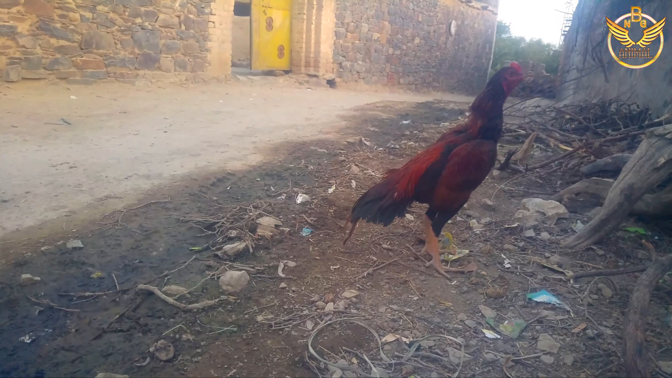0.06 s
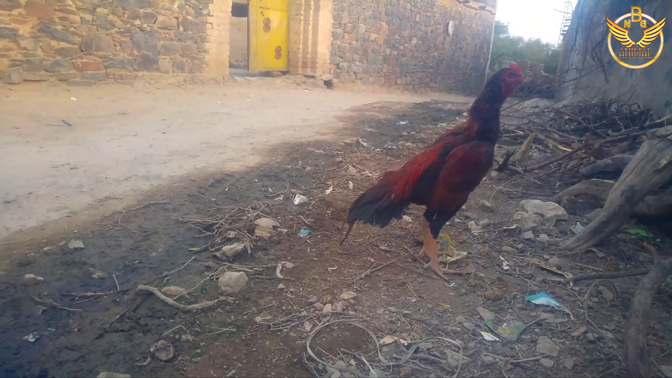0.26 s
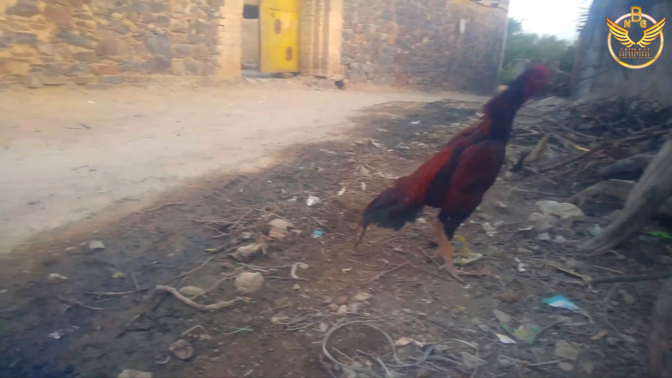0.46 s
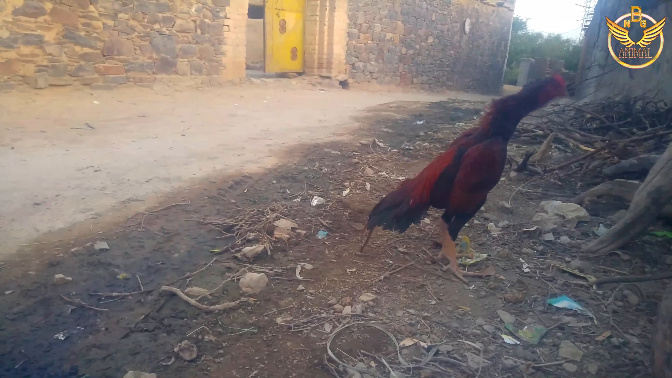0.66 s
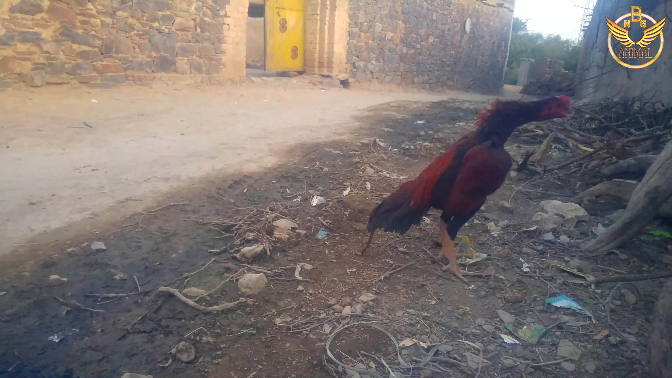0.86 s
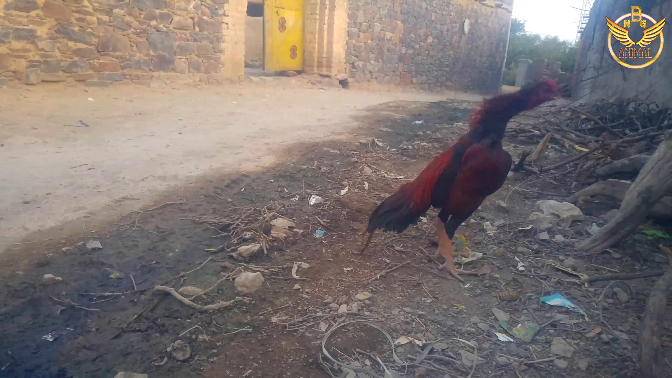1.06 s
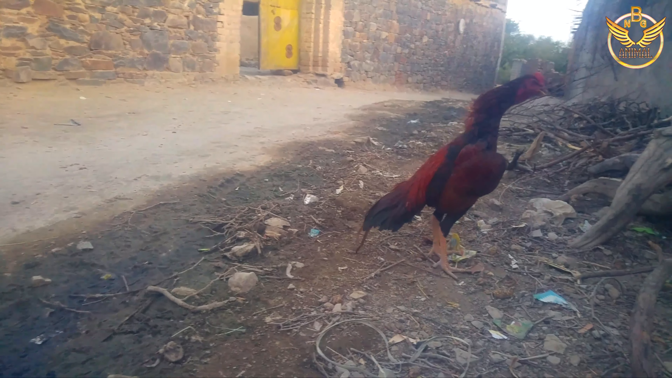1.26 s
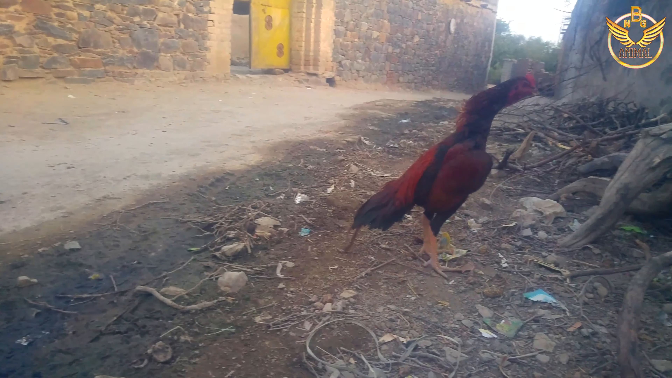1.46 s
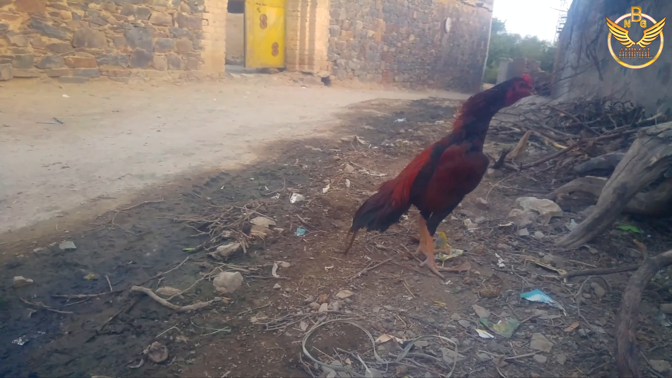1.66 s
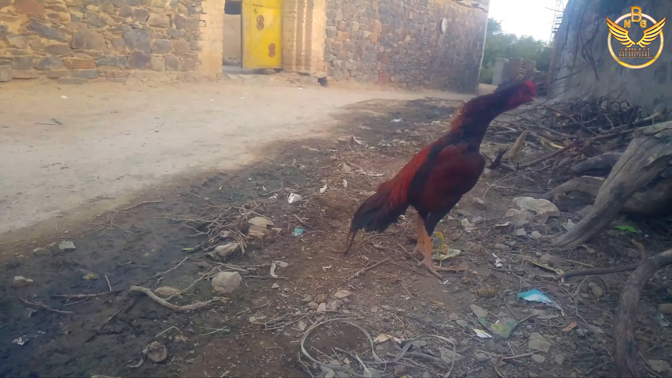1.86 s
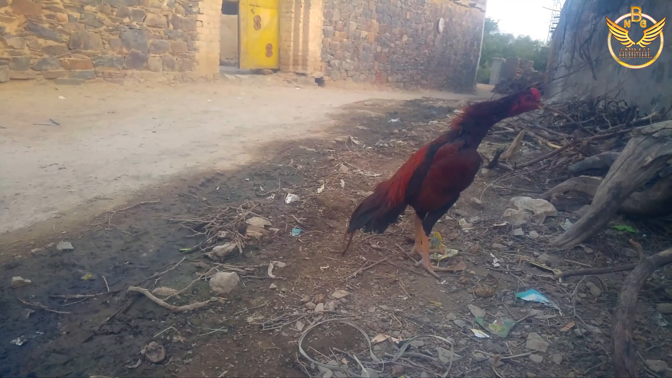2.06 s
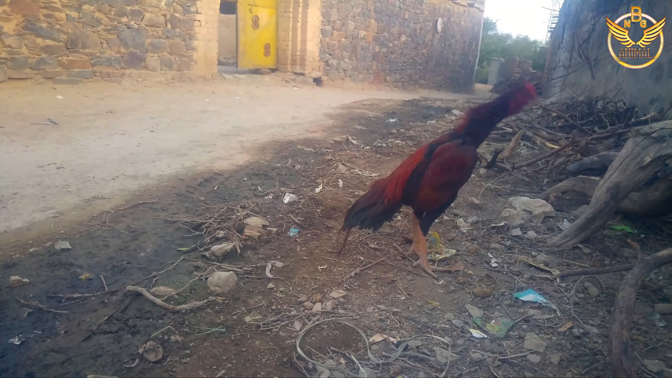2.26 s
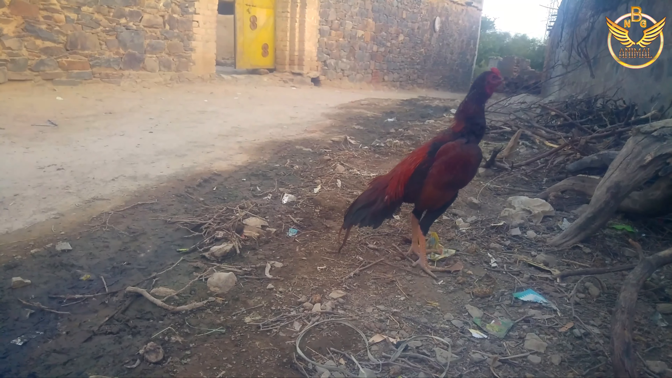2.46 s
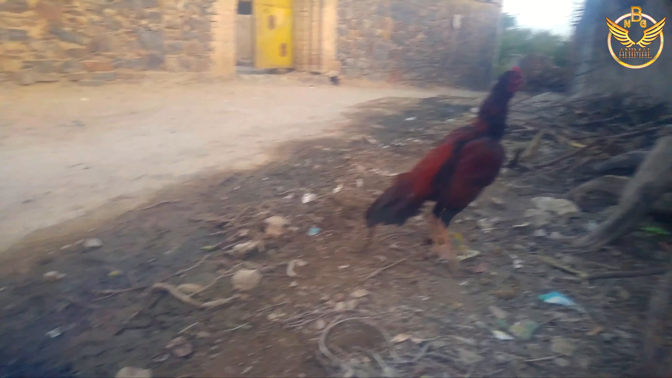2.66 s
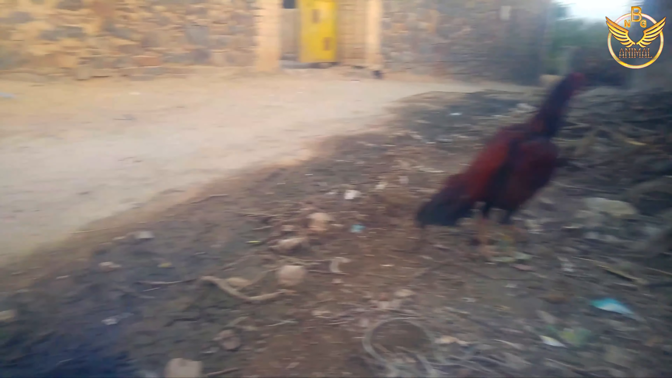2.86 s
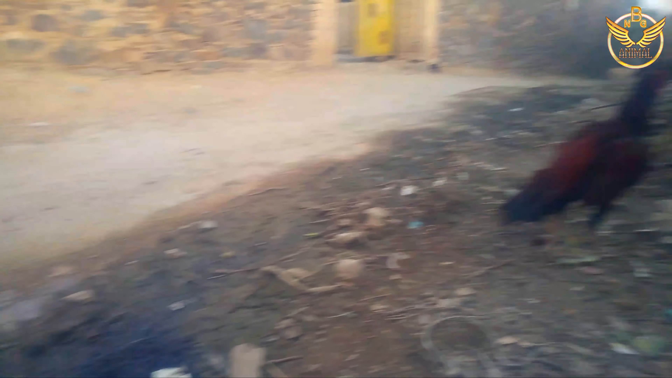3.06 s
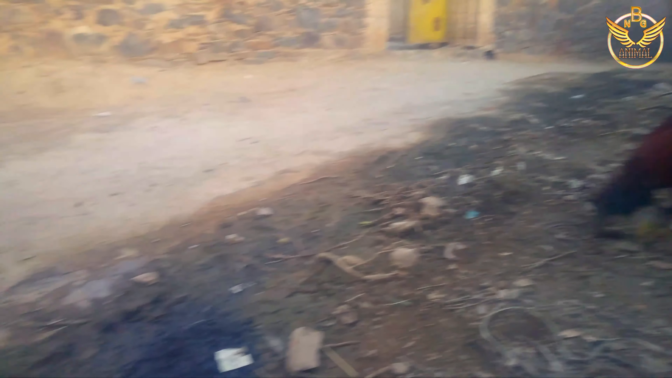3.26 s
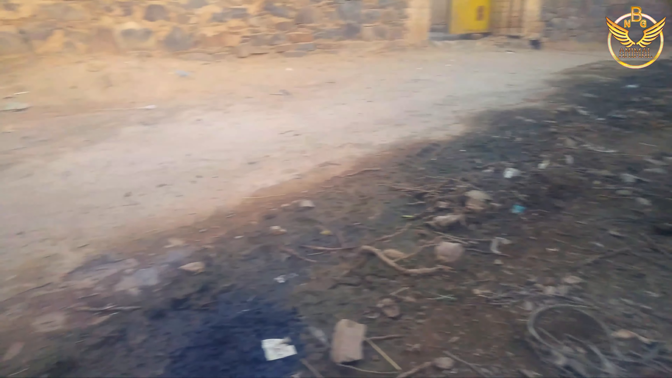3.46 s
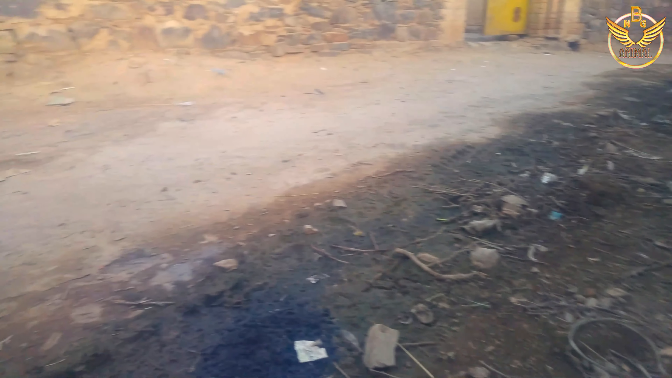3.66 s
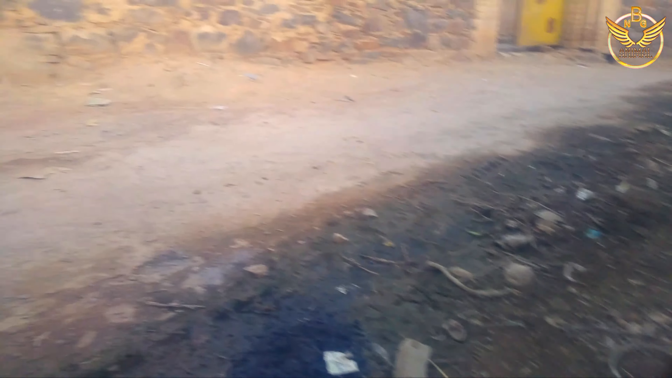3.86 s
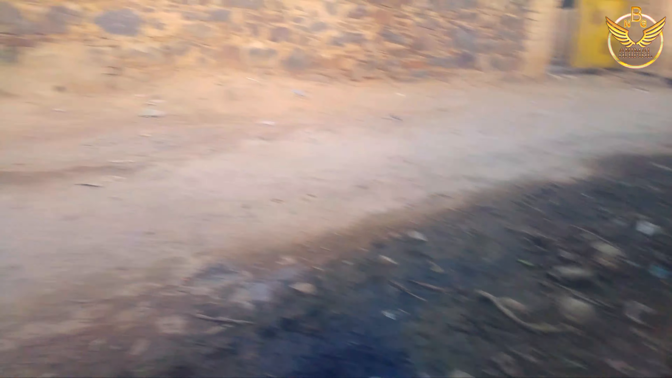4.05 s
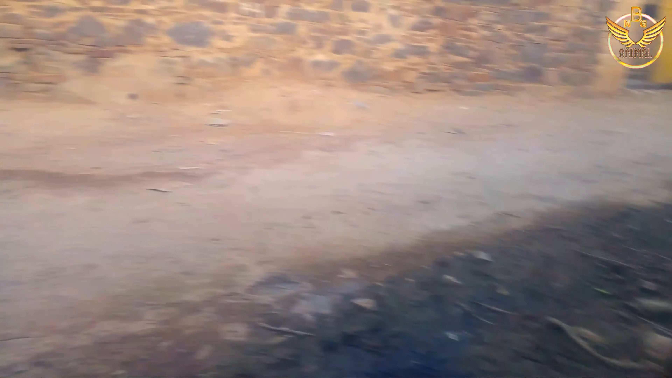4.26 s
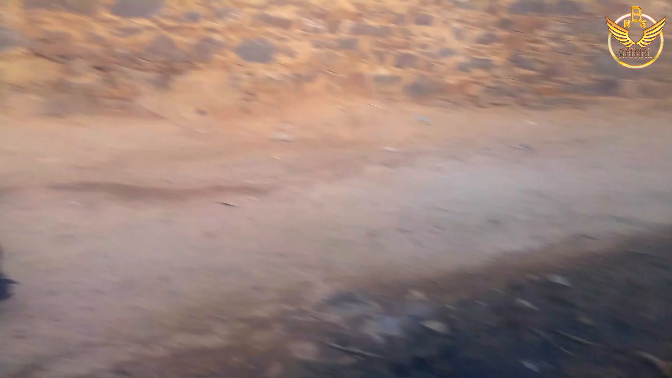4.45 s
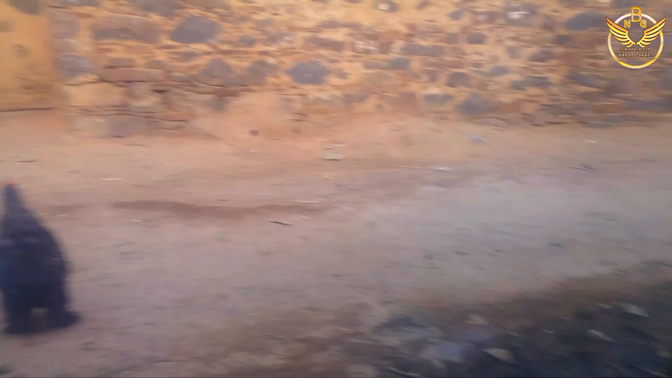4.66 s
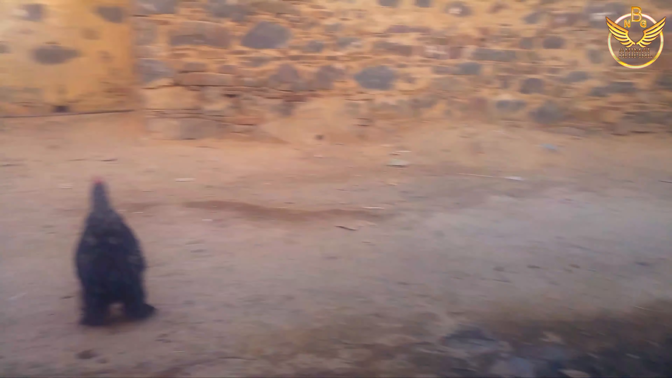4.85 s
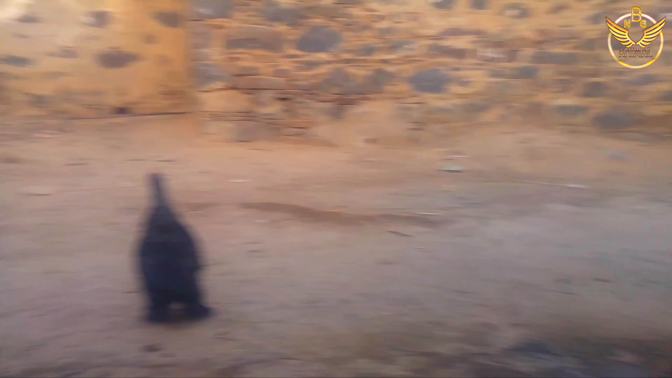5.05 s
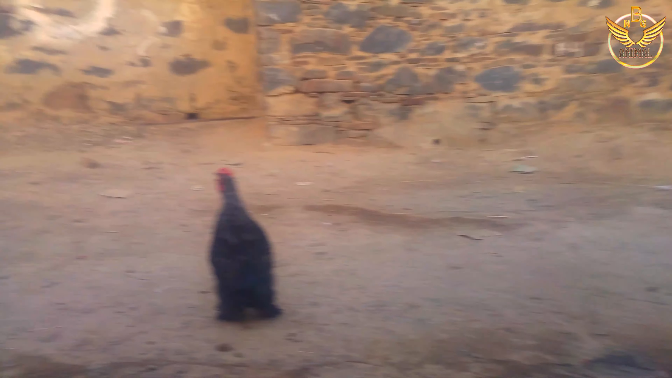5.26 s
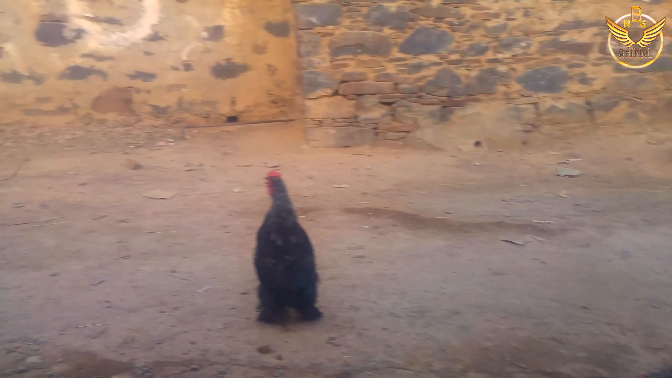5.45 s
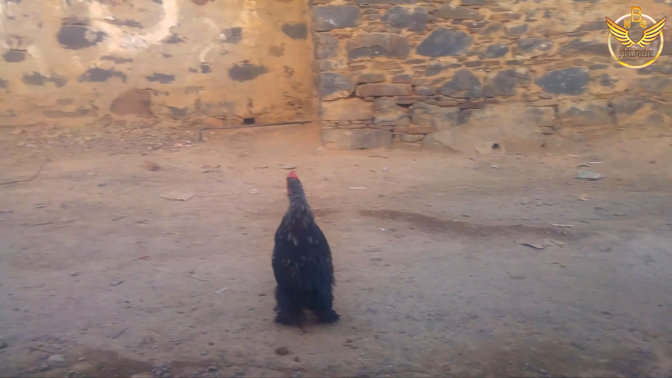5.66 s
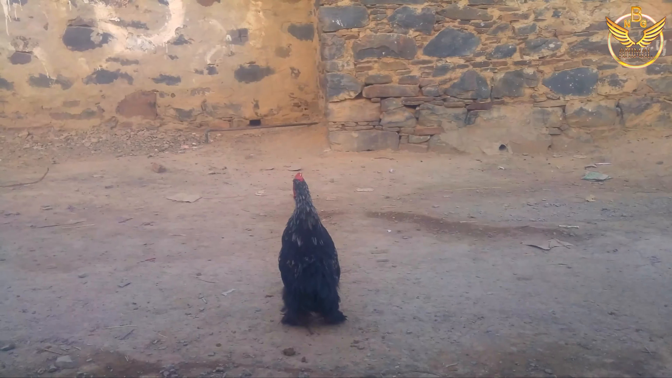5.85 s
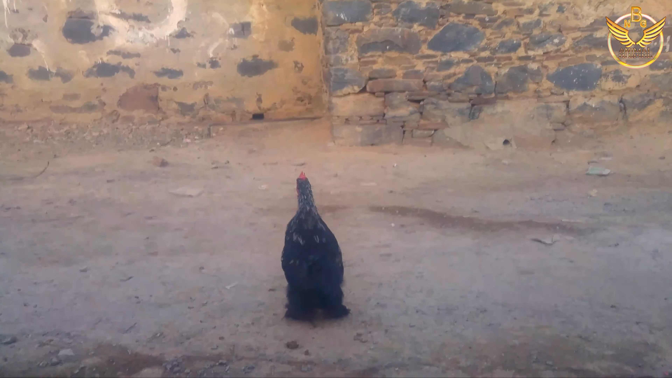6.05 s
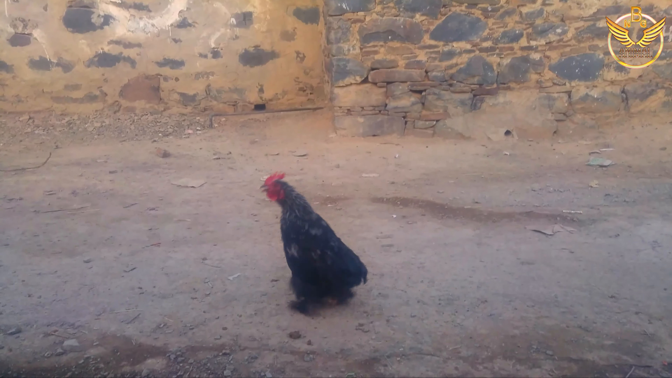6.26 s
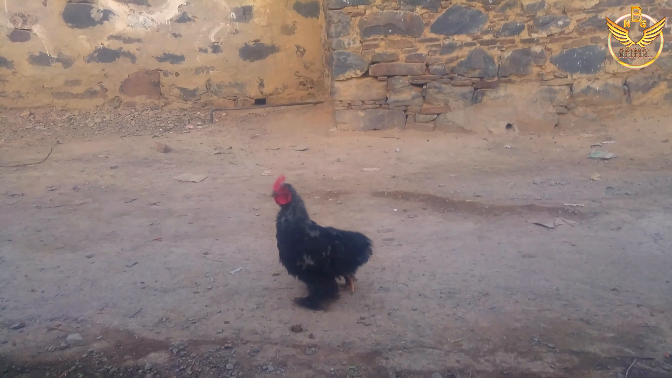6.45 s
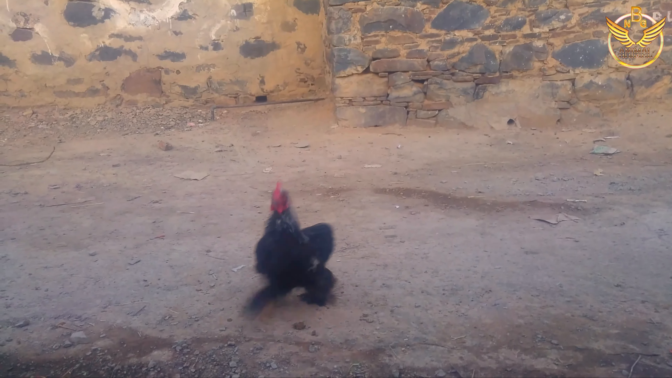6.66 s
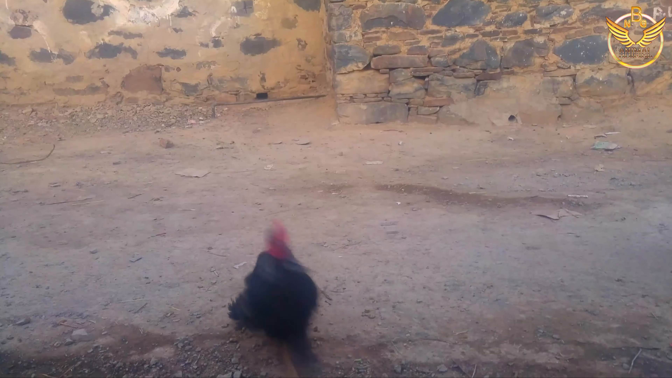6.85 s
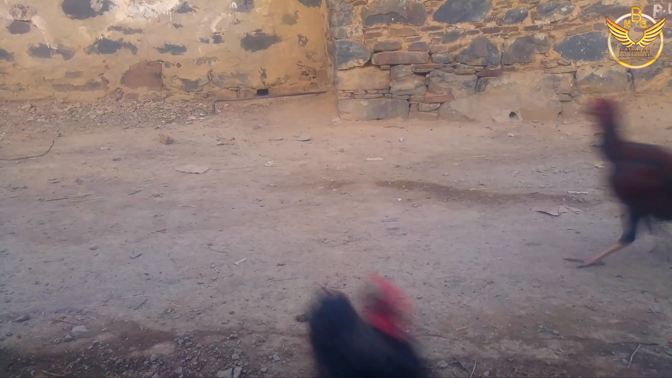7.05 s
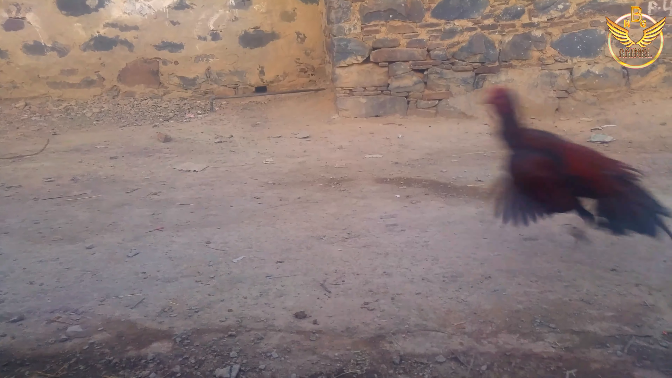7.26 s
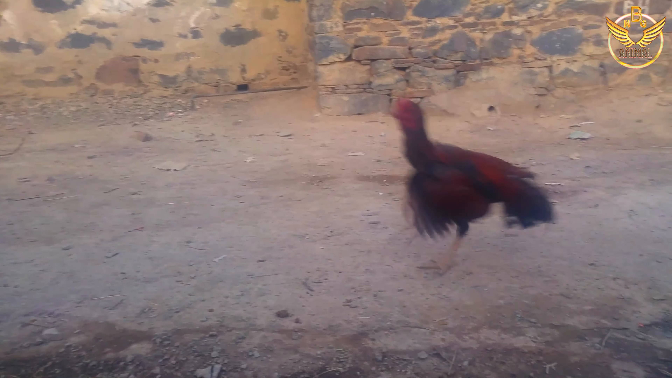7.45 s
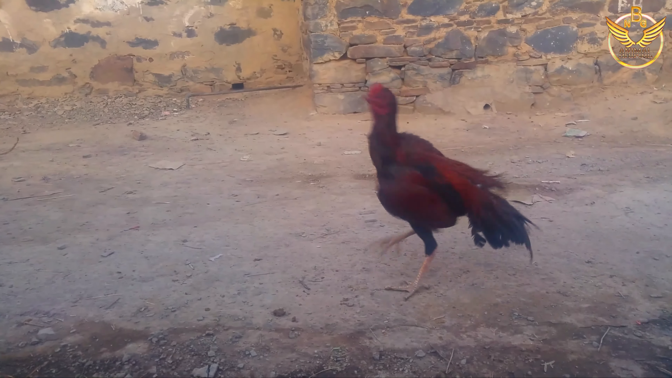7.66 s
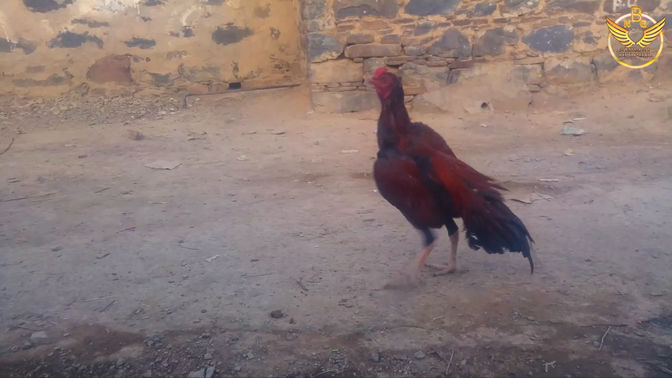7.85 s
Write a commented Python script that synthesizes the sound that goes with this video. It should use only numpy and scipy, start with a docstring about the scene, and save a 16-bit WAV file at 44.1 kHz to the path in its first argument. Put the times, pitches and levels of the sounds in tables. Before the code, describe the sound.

Near-silent open air, then a close, overdriven rooster crow in several rough, rattling syllables, with a short echo off stone walls. Feet scuff and crackle through dry leaves. A second, higher rooster crows, strained and buzzing, ending in a soft wavering whine. Finally feet patter on packed earth, with crisp grit and twig cracks near the microphone.

```python
"""Two roosters crow in turn in a walled dirt lane, close enough to overload the microphone: first a big
hoarse one, then a small shrill one that ends on a soft falling whine. Syrinx pulses ring throat resonances.
Around the crows, feet scuff through dry litter and patter over the ground: filtered noise grains and bursts.
Stone walls add an echo and a short tail, hollow rings linger after the big voice, and faint air lies beneath."""
import sys
import numpy as np
from scipy import signal
from scipy.fft import rfft, irfft, next_fast_len
from scipy.io import wavfile
from scipy.ndimage import uniform_filter1d

SR = 44100
rng = np.random.default_rng(int(sys.argv[2]) if len(sys.argv) > 2 else 0)


def pcm_store(signal):
    """Save signal as 16-bit PCM."""
    levels = np.round(np.clip(np.atleast_2d(signal), -1, 1) * 32767)
    wavfile.write(sys.argv[1], SR, levels.astype(np.int16).T)


N = 348831
TIME = np.arange(N) / SR
CUTOFF_HZ = 15600   # top of the voices' harmonics and of the whole sound

# spectrum of cracking dry litter and grit: frequency_hz, level_db
CRUNCH_SPECTRUM = [(880, -18), (1500, -22.5), (1690, -24), (2420, -18.5), (3610, -4), (4800, -10.5),
                   (5950, -1.5), (7670, -15.5), (11000, -10.5), (15500, -24.5)]


def from_db(db):
    """Amplitude factor of a level in dB."""
    return 10 ** (np.asarray(db) / 20)


def rms_one(x):
    """Scale to an overall RMS of 1."""
    return x / np.sqrt(np.mean(x ** 2) + 1e-20)


def in_time(rows, t=TIME):
    """Columns of a curve table, interpolated at the times t."""
    times_s, *columns = np.transpose(rows)
    return [np.interp(t, times_s, column) for column in columns]


def during(start_s, end_s):
    """1 between two times, with 5 ms fades inside them."""
    return np.clip(np.minimum(TIME - start_s, end_s - TIME) * 200, 0, 1)


def colour(x, points):
    """Filter by a spectrum of (Hz, dB) points, joined along log frequency."""
    hz, db = np.transpose(points)
    size = next_fast_len(x.shape[-1] + 2048)
    log_hz = np.log(np.arange(size // 2 + 1) * SR / size + 1)
    gain = from_db(np.interp(log_hz, np.log(hz), db))
    return irfft(rfft(x, size) * gain, size)[..., :x.shape[-1]]


def cut(x, hz, kind, order=4):
    """Low-pass or high-pass filter."""
    return signal.sosfilt(signal.butter(order, hz, kind, fs=SR, output="sos"), x + 1e-18)


def drift(rate_hz, size=N):
    """Random wander below a rate, with RMS 1."""
    settle = 8000   # samples dropped while the filter starts
    return rms_one(cut(rng.standard_normal(size + settle), rate_hz, "low", order=2)[settle:])


def resonate(x, hz, width_hz):
    """One resonance with gain 1 on top."""
    radius = np.exp(-np.pi * width_hz / SR)
    zeros = np.array([1, 0, -1]) * (1 - radius * radius) / 2
    poles = [1, -2 * radius * np.cos(2 * np.pi * hz / SR), radius * radius]
    return signal.lfilter(zeros, poles, x + 1e-18)


def evened(x, size=400):
    """Hold the short-term level at 1."""
    power = uniform_filter1d(uniform_filter1d(x * x, size), size)
    return x / np.sqrt(np.abs(power) + 1e-12)


def envelope_db(t, start, end, attack, release):
    """Attack, hold, release; each slope covers 30 dB in its time, outside the hold."""
    return -30 * (np.maximum(start - t, 0) / attack + np.maximum(t - end, 0) / release)


def decay(start_s, t60_s):
    """Envelope of a blow: an instant start, then 60 dB down per t60."""
    age = TIME - start_s
    return (age >= 0) * from_db(-60 * np.clip(age / t60_s, 0, 3))


def air(gain_db):
    """Faint open-air background of coloured noise, partly shared by both sides; it dips after the first crow."""
    # frequency_hz, level_db
    air_spectrum = [(18, -47), (30, -12), (69, -5), (256, -12.5), (307, -5), (492, -18), (606, -17),
                    (2300, -27.5), (5890, -22.5), (15500, -41)]
    # time_s, level_db before the gain
    air_level = [(0.1, -62.5), (0.8, -63.5), (2.5, -77), (2.78, -75), (3.1, -58), (4.9, -61.5), (6.7, -63),
                 (7.1, -49.5), (7.85, -59)]
    level_db, = in_time(air_level)
    noise = 2.4 * rng.standard_normal(N) + rng.standard_normal((2, N))
    return rms_one(colour(noise, air_spectrum)) * from_db(level_db + gain_db)


def lane(x, t60_s, wet_db, dull_hz, echo_s, echo_db):
    """The stone walls return one echo and a short tail, both dulled; the tail is decaying noise."""
    t = TIME[:SR]
    noise = rng.standard_normal((2, SR)) * .5 + rng.standard_normal(SR)
    tail = cut(noise, dull_hz, "low", order=1) * from_db(-60 * t / t60_s)
    tail *= t > .006   # the tail starts after 6 ms
    tail *= from_db(wet_db) / np.sqrt(np.sum(tail ** 2) / 2)
    dulled = cut(x, dull_hz, "low", order=1)
    echo = from_db(echo_db) * np.interp(TIME - echo_s, TIME, dulled)
    return signal.fftconvolve(x[None], tail, axes=1)[:, :N] + echo


def footfalls(thud_db, spray_db):
    """A foot thuds on packed earth and throws grit: two noises share the decay of each blow."""
    # footfalls: start_s, peak_db before the gains, t60_s, grit_db relative to the spray gain
    steps = [(3.48, -29, 0.39, 11), (7.178, -11.5, 0.11, -8.5), (7.296, -10, 0.17, -2),
             (7.476, -17.5, 0.18, 5)]
    # frequency_hz, level_db
    thud_spectrum = [(35, -50), (60, -11), (464, -9), (613, 0), (1240, -16), (2030, -32.5), (3000, -58),
                     (3900, -53.5), (6600, -120)]
    thud = rms_one(colour(rng.standard_normal(N), thud_spectrum))
    grains = rng.standard_normal((2, N)) * from_db(drift(360))
    grit = rms_one(colour(grains, CRUNCH_SPECTRUM))
    out = 0
    for start_s, peak_db, t60_s, grit_db in steps:
        blow = from_db(thud_db) * thud + from_db(spray_db + grit_db) * grit
        out = out + decay(start_s, t60_s) * from_db(peak_db) * blow
    return out


def snaps(crack_t60_s, crumble_t60_s, gain_db):
    """Each snap is a noise burst: a short crack with a longer crumbling under it."""
    # the loudest twigs and grit: start_s, peak_db before the gain, crumble_db relative to the crack
    snap_times = [(0.055, -34.5, -5), (3.2067, -24, 2), (3.4835, -13, -4), (3.94, -24, -6.5),
                  (4.1934, -16.5, -9.5), (4.3233, -24.5, -3), (6.6346, -24.5, -3), (6.7404, -22.5, -25),
                  (6.8011, -31.5, -3), (6.9826, -25, 6), (7.111, -26.5, 7), (7.2401, -14, -5),
                  (7.3618, -17.5, 3.5), (7.4153, -10.5, -2), (7.4308, -3.5, -8), (7.5405, -4.5, -17),
                  (7.5682, 0, -32), (7.612, -21.5, 5), (7.716, -32, 6.5), (7.8223, -34, 0)]
    envelope = 0
    for start_s, peak_db, crumble_db in snap_times:
        crumble = from_db(crumble_db) * decay(start_s, crumble_t60_s)
        envelope = envelope + from_db(peak_db) * (decay(start_s, crack_t60_s) + crumble)
    noise = rms_one(colour(rng.standard_normal((2, N)), CRUNCH_SPECTRUM))
    return from_db(gain_db) * envelope * noise


def scuffs(grains_per_s, crunch_gain_db, soil_gain_db):
    """Dry leaves crack in clumps of tiny random grains while the soil scrapes beneath."""
    # a faint rustle first, then feet in dry litter: start_s, end_s, crunch_db, soil_db (both before the gains)
    scuff_times = [(0.777, 0.87, -58, -77), (2.911, 2.918, -26, -44.5), (3.085, 3.129, -35.5, -58),
                   (3.194, 3.324, -29.5, -54), (3.332, 3.386, -25.5, -43), (3.483, 3.48, -16, -26),
                   (3.548, 3.588, -24, -36), (3.61, 3.765, -33, -58), (3.8, 4.503, -50, -71.5),
                   (4.064, 4.128, -40.5, -56), (4.55, 4.906, -56.5, -76), (6.793, 7.87, -53, -76),
                   (6.88, 6.915, -42.5, -53.5), (7.027, 7.255, -42.5, -51.5), (7.482, 7.626, -30.5, -54.5)]
    # soil scrape: frequency_hz, level_db
    soil_spectrum = [(35, -47), (60, -19), (507, -15), (602, 7.5), (962, -5.5), (1170, -45), (1800, -22),
                     (2340, -26), (3960, -120)]
    swell_s, fade_s = 0.053, 0.073
    grain_spread_db, clump_db = 3.8, 3.0
    boost_db = grain_spread_db * np.minimum(rng.exponential(1, N), 4)   # a few grains are much louder
    sizes = from_db(boost_db) * rng.standard_normal((2, N))
    grains = sizes * (rng.random(N) < grains_per_s / SR) * from_db(clump_db * drift(19.5))
    crunch = rms_one(colour(grains, CRUNCH_SPECTRUM))
    soil = rms_one(colour(grains[0] + .5 * grains, soil_spectrum))
    # the loudest scuff of the moment sets each level
    crunch_db, soil_db = np.max([envelope_db(TIME, start, end, swell_s, fade_s) + np.c_[levels_db]
                                 for start, end, *levels_db in scuff_times], axis=0)
    return crunch * from_db(crunch_db + crunch_gain_db) + soil * from_db(soil_db + soil_gain_db)


def placed(x, left_lag_ms):
    """The sound reaches the left side a little later than the right, or earlier if the lag is negative."""
    return np.array([np.interp(TIME - left_lag_ms / 1000, TIME, x), x])


def hollow_ring(x, hz, width_hz, spacing_hz, gain_db):
    """A hollow tone lingers after each note: two close resonances that beat."""
    return from_db(gain_db) * (resonate(x, hz, width_hz) + resonate(x, hz + spacing_hz, width_hz))


def whine(jitter, gain_db, flutter_db):
    """A thin, nearly pure, wavering note as the small rooster relaxes: a fundamental and its octave."""
    # time_s, pitch_hz, fundamental_db, octave_db (levels before the gain)
    whine_curve = [(6.49, 720.4, -44, -61), (6.526, 759, -28, -45), (6.585, 660, -47, -61),
                   (6.635, 719, -37.5, -64), (6.7, 663, -47, -49), (6.785, 640, -46.5, -55),
                   (6.82, 625, -72, -82), (6.862, 683, -29.5, -40), (6.89, 596, -57, -60)]
    pitch_hz, first_db, octave_db = in_time(whine_curve)
    phase = 2 * np.pi * np.cumsum(pitch_hz * (1 + jitter * drift(85))) / SR
    note = from_db(first_db) * np.sin(phase) + from_db(octave_db) * np.sin(2 * phase)
    flutter = from_db(gain_db + flutter_db * drift(46.4))
    return flutter * during(whine_curve[0][0], whine_curve[-1][0]) * note


def aimed(x, corner_hz):
    """The highest overtones beam out of the beak, so their level follows its aim."""
    # the small rooster turns its open beak forward: time_s, top_treble_db
    beak_aim = [(5.2, -3.5), (6.1, -4.5), (6.28, 7)]
    aim_db, = in_time(beak_aim)
    top = colour(x, [(corner_hz * .8, -60), (corner_hz, 0)])
    return x + top * (from_db(aim_db) - 1)


def syllable(t, row, scoop):
    """One push of air: it scoops up, glides, changes in strength and drops away, its edges set to rough."""
    scoop_s = 0.013      # the slide up into a syllable and down out of it
    edge_rough = 0.95    # roughness as the voice catches and lets go
    start, end, attack, release, first_hz, last_hz, level_db, treble_db, fade_db, rough = row
    progress = np.interp(t, [start, end], [0, 1])
    loose = .5 - .5 * np.tanh(np.minimum(t - start, end - t) / (2 * scoop_s))
    pitch_hz = (first_hz + (last_hz - first_hz) * progress) * (1 - scoop * loose)
    effort_db = envelope_db(t, start, end, attack, release) + fade_db * progress
    roughness = rough + (edge_rough - rough) * loose ** 2
    return np.array([pitch_hz, level_db + effort_db, treble_db + effort_db, roughness])


def phrase(t, syllables, tones, scoop):
    """The strongest syllable leads the voice, except where it locks onto a clear tone."""
    break_s = 0.013   # the jump into or out of a clear tone
    each = np.array([syllable(t, row, scoop) for row in syllables])
    strongest = each[:, 1].argmax(axis=0)
    controls = each[strongest, :, np.arange(len(t))].T
    for start, end, first_hz, last_hz, level_db, treble_db, rough in tones:
        locked = np.clip(1 + np.minimum(t - start, end - t) / break_s, 0, 1)
        tone = [np.interp(t, [start, end], [first_hz, last_hz]), level_db, treble_db, rough]
        controls = [free + locked * (held - free) for free, held in zip(controls, tone)]
    return controls


def throbbing(t, rattles, sharpness):
    """Slack of the syrinx, 0 on each throb and 1 between: it gives way slowly and catches again quickly."""
    lean = 1.4   # above 1, the dip comes late in each throb
    slack = np.zeros(len(t))
    for start, end, first_rate, last_rate in rattles:
        rate = np.interp(t, [start, end], [first_rate, last_rate], left=0, right=0)
        cycle = np.cumsum(rate) / SR % 1
        slack += np.sin(np.pi * cycle ** lean) ** sharpness * (rate > 0)
    return slack


def crow(syllables, tones, rattles, throat, scoop, split_hz, jitter, doubling, rasp, sag,
         throb_db, treble_throb_db, throb_rough):
    """Syrinx pulses ring the throat; under strain they jitter, alternate strong and weak, and turn to rasp."""
    tremor = .004         # RMS share of the pitch
    cycle_scatter = .07   # RMS radians
    leak = .14            # least roughness of the air leaking through the syrinx
    body_cut_hz = 590     # the throat radiates little below this
    treble_duty = 0.6     # below 1, overtones sound in a shorter part of each throb than the note itself
    gate = during(syllables[0][0] - .03, syllables[-1][1] + .1)
    t = TIME[gate > 0]
    pitch, level_db, treble_db, rough = phrase(t, syllables, tones, scoop)

    # between throbs the note sags, weakens and breaks up; no two throbs are alike
    slack = throbbing(t, rattles, sharpness=2.5)
    slack = slack * np.clip(1 + .25 * drift(25, len(t)), 0, 2)
    rough = np.clip(rough + throb_rough * slack, 0, 1)
    wander = 1 + jitter * rough * drift(200, len(t)) + tremor * drift(70, len(t))
    pitch = pitch * (1 - sag * slack ** 2) * wander

    # no two cycles are timed alike, which frays the upper partials
    phase = 2 * np.pi * np.cumsum(pitch) / SR + cycle_scatter * drift(210, len(t))
    pulses = sum(np.cos(k * phase) * (k * pitch < CUTOFF_HZ) for k in range(1, 28))
    # partials halfway between the harmonics make pulses alternate
    halves = sum(np.cos((k + .5) * phase) * (k * pitch < CUTOFF_HZ) for k in range(28))
    hiss = rng.standard_normal(len(t)) * (1 + np.cos(phase))   # air puffs with each cycle
    hiss = hiss + .5 * cut(hiss, 2500, "high", order=1)
    syrinx = evened(pulses) + doubling * rough * evened(halves)
    syrinx = syrinx + rasp * (rough ** 2 + leak ** 2) * hiss

    voice = 0
    for hz, width_hz, db in throat:
        voice = voice + from_db(db) * resonate(resonate(syrinx, hz, width_hz), hz, width_hz)
    low = cut(voice, split_hz, "low", order=8)
    body = evened(cut(low, body_cut_hz, "high", order=5))
    edge = evened(cut(voice, split_hz, "high", order=8))
    edge = edge * from_db(2.0 * drift(80, len(t)))   # the overtones flicker
    body = body * from_db(level_db - throb_db * slack)
    edge = edge * from_db(treble_db - treble_throb_db * slack ** treble_duty)
    out = np.zeros(N)
    out[gate > 0] = body + edge
    return out * gate


def scene():
    """Both crows with their rings and walls, the ground under the feet, and the air."""
    # throat and beak resonances: frequency_hz, width_hz (of each of two passes), level_db
    big_throat, small_throat = [(726.6, 260, 11), (988, 81, 0), (1526, 140, -3), (2546, 250, -13.5),
                                (3742, 280, -2), (5690, 280, -20.5), (6654, 310, -12), (8800, 900, -34),
                                (11100, 11000, -32)], [(1007, 270, 4), (2093, 736, 1), (3158, 230, 1.5),
                                                    (4760, 1100, -11.5), (6110, 250, -13), (6910, 130, -13),
                                                    (9460, 920, -16.5), (11900, 1100, -23)]
    # hoarse syllables: start_s, end_s, attack_s, release_s, first_pitch_hz, last_pitch_hz,
    # level_db, treble_db, fade_db (change over the syllable), roughness (0-1)
    big_syllables, small_syllables = [(0.965, 1.163, 0.006, 0.037, 514, 600, -6, -17.5, -2.5, 0.55),
                                      (1.289, 1.418, 0.0067, 0.024, 574, 819, -8.5, -21.5, 1.5, 0.2),
                                      (1.56, 1.897, 0.032, 0.044, 784, 750.4, 0, -14, -2.5, 0.18),
                                      (1.93, 2.005, 0.03, 0.03, 477.5, 575, -23.5, -36.5, 2.5, 0.6),
                                      (2.012, 2.194, 0.012, 0.05, 729.4, 616, -5, -15, -10, 0.7)], [(5.211, 5.415, 0.0086, 0.1, 951.4, 800, -9, -12.5, -7.5, 0.43),
                                                             (5.49, 5.588, 0.055, 0.073, 1010, 1040, -3.5, -10, -7, 0.55),
                                                             (5.685, 6.1, 0.06, 0.023, 998.5, 1004, -3.5, -13, -4, 0.49),
                                                             (6.118, 6.396, 0.012, 0.033, 1126, 941, -12.5, -20, -1.5, 0.45)]
    # the voice breaks into a clear held tone: start_s, end_s, first_pitch_hz, last_pitch_hz,
    # level_db, treble_db, roughness (0-1)
    big_tones, small_tones = [(1.066, 1.088, 517.7, 531, -10, -11.5, 0),
                              (1.129, 1.163, 619.1, 560.2, -13, -22.5, 0),
                              (1.317, 1.341, 642.6, 655, -2.5, -20, 0.1),
                              (1.351, 1.401, 796, 825, 3.5, -16, 0)], [(5.225, 5.271, 908.4, 957, 2, -17, 0.026),
                                                 (5.28, 5.314, 1012, 1030, -3, -14.5, 0.038),
                                                 (5.327, 5.36, 903, 912, -4, -18.5, 0.3),
                                                 (5.494, 5.518, 985.9, 988, -2.5, -9.5, 0.44),
                                                 (5.522, 5.584, 1141, 1082, -2, -10.5, 0.062),
                                                 (5.693, 5.747, 956.2, 955.6, -8.5, -15, 0.2),
                                                 (6.03, 6.111, 928.3, 927.4, -6, -21, 0.27),
                                                 (6.213, 6.269, 987.5, 982, -7, -19, 0.13),
                                                 (6.289, 6.377, 1051, 1007, -9.5, -16, 0.08)]
    # the voice rattles: start_s, end_s, first_rate (throbs per s), last_rate (throbs per s)
    big_rattles, small_rattles = [(1.36, 1.411, 37, 41), (1.563, 1.904, 33.3, 25.4),
                                  (2.011, 2.188, 33.9, 33.9)], [(5.759, 6.018, 32.3, 29.5)]
    # level of the left side against the right: frequency_hz, level_db
    left_shade = [(100, -5), (700, -1.5), (1100, 2), (2000, -1), (3000, -4), (3800, -15.5), (5000, -14),
                  (6700, -15.5), (10000, -14.5), (15000, -1)]

    ground = scuffs(grains_per_s=2700, crunch_gain_db=-3.5, soil_gain_db=2.0)
    ground = ground + snaps(crack_t60_s=.012, crumble_t60_s=.1, gain_db=-11.0)
    ground = ground + footfalls(thud_db=-9.5, spray_db=-9)

    # jitter is an RMS share of the pitch at full roughness
    big = crow(big_syllables, big_tones, big_rattles, big_throat, scoop=0.26, split_hz=2570,
               jitter=.018, doubling=0.72, rasp=.45, sag=0.15,
               throb_db=11.5, treble_throb_db=15, throb_rough=0.75)
    small = crow(small_syllables, small_tones, small_rattles, small_throat, scoop=0.2, split_hz=1394,
                 jitter=.022, doubling=0.33, rasp=1.8, sag=0.21,
                 throb_db=11.5, treble_throb_db=4.5, throb_rough=0.3)
    small = aimed(small, corner_hz=8590) + whine(jitter=0.00214, gain_db=2, flutter_db=1.5)

    birds = placed(big, left_lag_ms=0.21) + placed(small, left_lag_ms=-0.066)
    birds = birds + hollow_ring(big, hz=602.2, width_hz=6.5, spacing_hz=29, gain_db=5.5)
    # a thinner, higher ring lingers too
    birds = birds + hollow_ring(big, hz=2494, width_hz=30, spacing_hz=164, gain_db=-1)
    birds = birds + lane(big, t60_s=0.16, wet_db=-16.0, dull_hz=2920, echo_s=0.075, echo_db=-27.5)
    birds = birds + lane(small, t60_s=0.29, wet_db=-19, dull_hz=2080, echo_s=0.0071, echo_db=-27)

    left, right = birds + ground
    # the shade tips the balance; a lift of both sides keeps their mean
    both_lift = [(hz, -20 * np.log10((1 + from_db(db)) / 2)) for hz, db in left_shade]
    shaded = np.array([colour(left, left_shade), right])
    return colour(shaded, both_lift) + air(gain_db=2)


def record(dry, limit=1.7, release_db_per_s=500, top=0.97, lopsided=0.033):
    """A fast limiter holds peaks down; what is left overloads a little lopsidedly; both band ends are cut."""
    over_db = 20 * np.log10(np.maximum(np.abs(dry).max(axis=0) / limit, 1))
    # the running maximum over a rising ramp lets the reduction fall back at a steady rate
    ramp_db = release_db_per_s * TIME
    reduction_db = np.maximum.accumulate(over_db + ramp_db) - ramp_db
    held = dry * from_db(-uniform_filter1d(reduction_db, size=90))
    bent = held + lopsided * cut(held ** 2, 200, "low", order=1)
    clipped = top * bent / (1 + (bent / top) ** 8) ** (1 / 8)
    top_cut = signal.ellip(10, .1, 70, CUTOFF_HZ, fs=SR, output="sos")
    return signal.sosfilt(top_cut, cut(clipped, 37, "high", order=1))


dry = scene()
out = record(dry)
pcm_store(out)
```